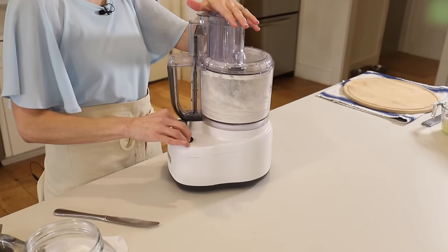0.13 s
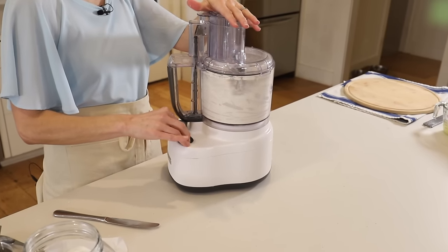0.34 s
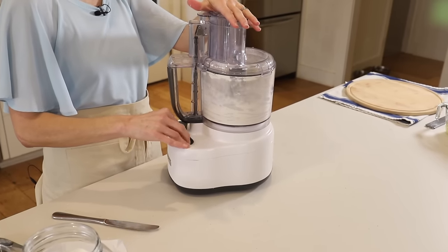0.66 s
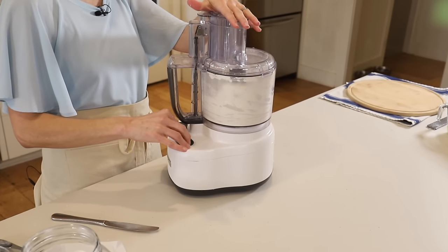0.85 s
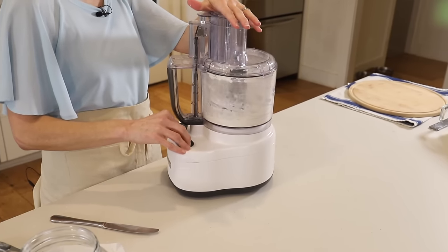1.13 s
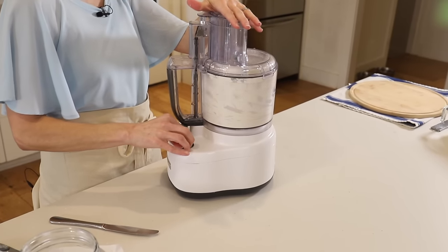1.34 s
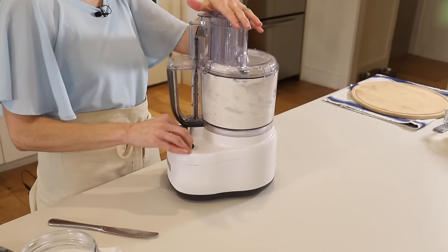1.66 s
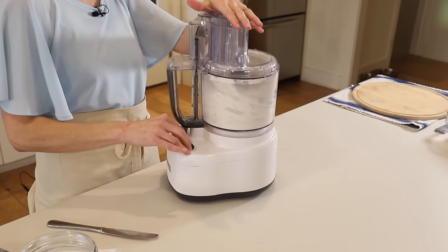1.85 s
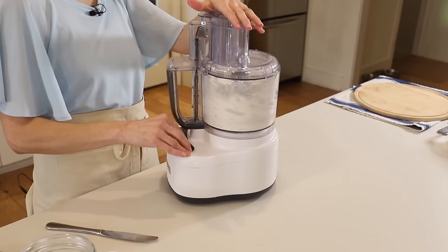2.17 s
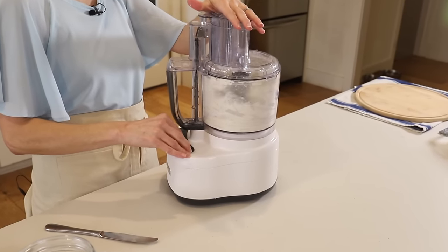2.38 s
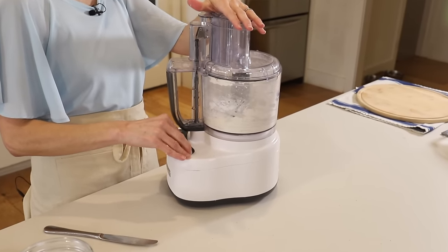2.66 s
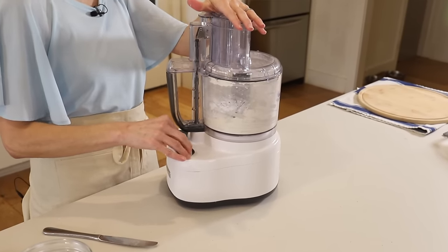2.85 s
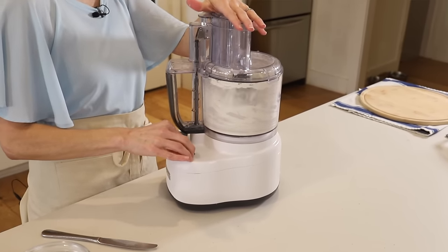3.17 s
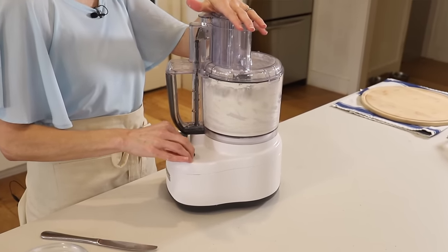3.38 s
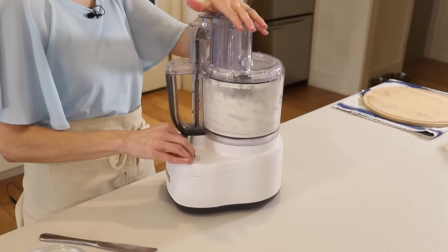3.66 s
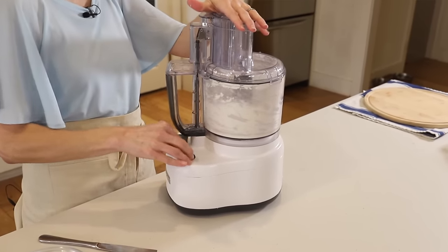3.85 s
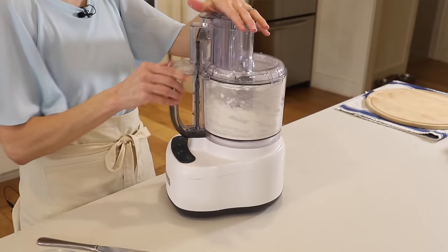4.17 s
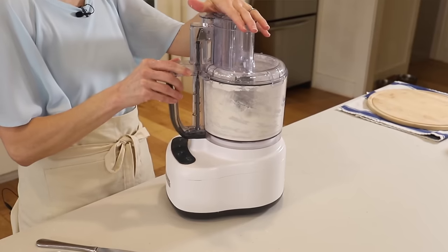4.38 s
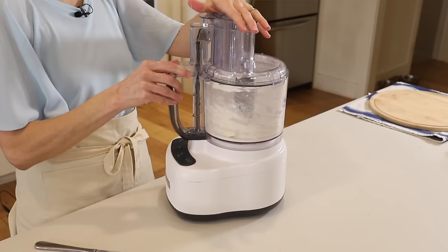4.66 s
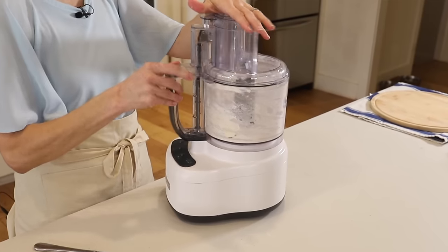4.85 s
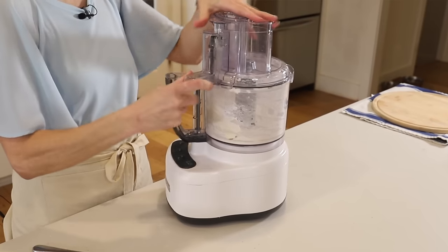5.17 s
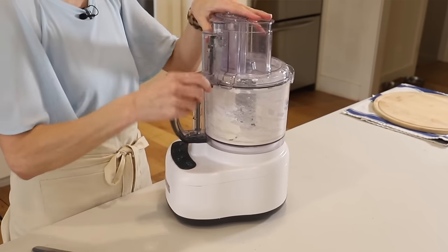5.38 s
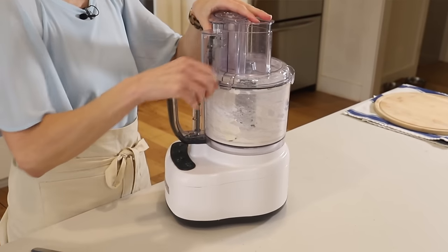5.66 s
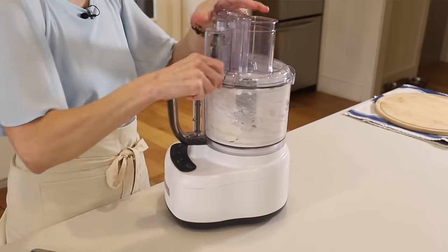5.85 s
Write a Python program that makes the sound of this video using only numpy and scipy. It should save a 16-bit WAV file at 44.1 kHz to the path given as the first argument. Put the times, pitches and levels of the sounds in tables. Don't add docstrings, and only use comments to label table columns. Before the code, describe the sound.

A food processor is already running, its loud whining gears and rough grind peppered with lumps knocking the plastic bowl. It winds down and brakes with a judder, pulses again, stops, then runs a longer, smoother pulse that sags to a halt. Crisp latch clacks, small lid taps and skin rubbing on plastic follow. Close chest-worn microphone, small kitchen with short echo and soft hiss.

```python
import sys
import numpy as np
from scipy import signal
from scipy.io import wavfile
from scipy.ndimage import uniform_filter1d

SR = 44100
rng = np.random.default_rng(int(sys.argv[2]) if len(sys.argv) > 2 else 0)


def wrap_up_sound(samples):
    columns = np.atleast_2d(samples).T
    tamed = np.clip(columns, -1, 1)
    steps = np.round(tamed * 32767).astype(np.int16)
    wavfile.write(sys.argv[1], SR, steps)


def ratio_of_db(decibels):
    return 10 ** (np.asarray(decibels, float) / 20)


N = 265555

# switch on t/s, brake grips t/s, lumpiness [0-1], free whine level/dB
PULSES = [
    (-.2, 0.887, .75, -25),
    (1.246, 2.266, 0.75, -24),
    (2.974, 4.512, 0.5, -24.5),
]
# t/s, churn level/dB
EFFORT = [
    [(0, -14), (.07, -19), (.3, -20.5), (.55, -20.5), (.7, -16.5), (.88, -20), (.925, -17.5), (1.0, -30),
     (1.07, -9.5)],
    [(1.268, -21), (1.31, -10), (1.41, -22.5), (1.58, -18), (1.72, -21.5), (1.92, -18.5), (2.26, -17.5),
     (2.33, -21), (2.53, -33)],
    [(2.992, -18.5), (3.02, -17), (3.08, -20), (3.23, -16.5), (3.35, -18), (4.42, -17.5), (4.51, -24),
     (4.61, -26.5), (4.73, -53)],
]
# f/Hz, level/dB
HOUSING = [(26, -94.5), (45, -43), (178, -2.5), (314, -9), (391, 5), (996, -5.5), (1210, -8.5), (1440, 0),
           (1800, -4.5), (2190, 0.5), (2600, -5.5), (3010, -2.5), (8660, -25), (16000, -34)]
# f/Hz, width/Hz, lift/dB
RINGS = [(431, 120, -1), (686, 15, 4.5), (960, 410, 8), (1420, 29, 6), (2180, 120, 5.5), (2650, 23, 6),
         (2930, 45, 2), (4620, 140, 6)]


def motor(effort, fall, pulse, load, teeth=85.0, lumps_per_turn=3.0, flecks_per_turn=3.2):
    overtone_fall = {"driven": -10.0, "braked": -2.0}
    # low f/Hz, high f/Hz
    patches = [(150, 700), (700, 1700), (1700, 2700), (2700, 4200), (4200, 9000)]
    # f/Hz, width/Hz, level above the churn/dB
    bowl_note = (2180, 60, -13.0)
    s, churn_db = np.transpose(effort)
    t = np.arange(s[0], s[-1], 1 / SR)
    count = len(t)
    churn_db = np.interp(t, s, churn_db)
    hz, first, bite, lumpy = speed_and_strain(t, fall, *pulse)
    speeding_up = np.gradient(hz) > 0
    lumpy = np.clip(lumpy, 0, .95)
    lump_swells = swells(lumps_per_turn * hz / teeth, 2.5, 0.0052)
    shake = np.sqrt(1 - lumpy ** 2 + (lumpy * lump_swells) ** 2)

    turn = np.exp(2j * np.pi * np.cumsum(hz) / SR)
    strain = shake + 1.94 * load[round(s[0] * SR):][:count]
    whine = first * np.clip(hz / 650, 0, 1) ** 2 * strain * turn
    whine = whine * flutter(count, 110, 0.98 - 0.95 * hz / 3300)
    fall_db = np.where(speeding_up, overtone_fall["driven"], overtone_fall["braked"])
    for k in range(2, 8):
        lift_db = read(HOUSING, k * hz) - read(HOUSING, 2 * hz) + fall_db * (k - 2)
        whine += bite * ratio_of_db(np.minimum(lift_db, 3)) * flutter(count, 40 * k, 0.46) * turn ** k
    shrill = ratio_of_db(-37.5 - 6.0 * ((3 * hz - 8350) / 450) ** 2) * speeding_up
    whine += shrill * flutter(count, 90, 0.84) * turn ** 3

    noise = shake * rng.standard_normal(count)
    ringing = np.clip(hz / 1100, 0, 1) ** 0.41
    plain = signal.oaconvolve(noise, causal(lambda f: read(HOUSING, f)))[:count]
    resonant = signal.oaconvolve(noise, causal(housing_db))[:count]
    grind = ringing * resonant + (1 - ringing) * plain
    for lo_hz, hi_hz in patches:
        flecks = swells(flecks_per_turn * hz / teeth, 2.5, 0.0031)
        grind = grind + 0.97 * lumpy * flecks * band(grind, lo_hz, hi_hz)
    note_hz, width, note_db = bowl_note
    note = evened(band(noise, note_hz - width / 2, note_hz + width / 2, order=1))
    note = ratio_of_db(note_db) * np.clip(hz / 2400, 0, 1) ** 1.5 * note

    sparks = evened(band(noise, 11000, 11500))
    air = evened(band(rng.standard_normal(count), 5300, 9130, order=4)) + ratio_of_db(-31.0) * sparks
    fan = ratio_of_db(-38.0) * (hz / 3300) ** 0.6 * air
    fade_in = np.minimum(1, (t - s[0]) / 0.0088 + (s[0] < .01))
    fade_out = np.minimum(1, (s[-1] - t) / 0.07)
    churn = ratio_of_db(churn_db - 1.0) * (evened(grind) + note)
    return s[0], fade_out * fade_in * (churn + whine.real + fan)


def speed_and_strain(t, fall, on_s, brake_s, lumpy, free_db):
    # t after the switch/s, rate of meeting gear teeth f/Hz
    climb = [
        (.018, 600),
        (.036, 930),
        (.075, 1564),
        (.115, 1950),
        (.165, 2394),
        (.225, 2813),
        (.35, 2996),
        (.5, 3240),
        (.75, 3410),
    ]
    # t/s, length/s, whine level/dB, overtone level/dB
    bites = [(0.594, 0.11, -21, -26), (0.914, 0.06, -15.5, -14), (0.966, .06, -27.5, -19),
             (1.284, 0.049, -24, -12), (1.34, .09, -20.5, -52), (2.255, 0.058, -17.5, -15.5),
             (2.35, 0.057, -17, -13), (2.053, 0.053, -22, -45), (4.195, 0.11, -26, -40),
             (2.311, 0.038, -26, -14), (2.406, 0.11, -34, -23.5), (3.008, 0.022, -33, -16),
             (3.018, 0.072, -48, -10), (3.07, .05, -17.5, -40), (3.213, 0.072, -16, -32),
             (4.454, 0.1, -30, -31), (4.52, 0.043, -19.5, -18), (4.554, 0.038, -33, -21.5),
             (4.595, 0.068, -59, -21), (0.668, 0.035, -27, -30)]
    top_hz, idle_db, top_db = 3200, -52, -37
    rise, fade_db = 0.11, -6
    hz = np.minimum(np.interp(t - on_s, *np.transpose(climb)), np.interp(t, *np.transpose(fall)))
    hz = uniform_filter1d(hz, size=400, mode="nearest")
    coasting = (t > fall[0][0]) * np.clip(1 - hz / top_hz, 0, 1)
    ring_lift_db = housing_db(hz) - read(HOUSING, hz)
    whine = ratio_of_db(free_db + 0.46 * ring_lift_db - 9 * coasting)
    bite = ratio_of_db(idle_db + (top_db - idle_db) * np.clip((hz - top_hz + 150) / 150, 0, 1))
    for s, length, whine_db, bite_db in bites:
        u = (t - s) / length
        shape = np.clip(u / rise, 0, 1) * np.clip((1 - u) / rise, 0, 1)
        shape = shape * ratio_of_db(fade_db * np.clip(u, 0, 1))
        whine = whine + ratio_of_db(whine_db) * shape
        bite = bite + ratio_of_db(bite_db) * shape
    return hz, whine, bite, lumpy * (1 - .3 * np.clip((t - brake_s) / .015, 0, 1))


def housing_db(hz):
    return read(HOUSING, hz) + sum(db / (1 + (2 * (hz - f) / width) ** 2) for f, width, db in RINGS)


def lumps(burst_s=0.0023):
    # t/s, peak level/dB, ring f/Hz, low thud level above the peak/dB
    hard_lumps = [(.069, -2, 3000, -15), (.115, -7.5, 3020, 9), (.203, -2, 2200, -13),
                  (.27, 2.5, 670, -0.5), (.309, -7, 2180, 9), (.437, -2, 2210, 0.5), (.493, -3.5, 2810, 6),
                  (.591, -7.5, 1385, -20), (.6115, 3, 2260, -35), (.755, -6, 1350, 9.5),
                  (.778, 0, 660, -31), (.905, -2.5, 950, 1), (1.279, -8, 790, -6), (1.384, -1.5, 2190, -29),
                  (1.46, -1.5, 2750, -20), (1.515, 0.5, 3080, -24), (1.6145, 0, 2180, -19),
                  (1.656, -1, 800, 8), (1.716, -7, 804, 1.5), (1.741, -5, 2100, 10),
                  (1.823, -22, 2090, -11), (1.8835, -0.5, 1420, 0.5), (1.939, 4.5, 920, -28),
                  (2.018, -6.5, 2770, -2), (2.1565, 1, 2060, -11), (2.1755, -8, 2190, -18),
                  (3.006, -1, 854.6, -5), (3.377, -0.5, 2182, 0), (4.072, -2, 2650, -13),
                  (4.2575, 0.5, 2190, 0)]
    out, load = np.zeros(N), np.zeros(N)
    colour, t = causal(housing_db), np.arange(1200) / SR
    blow = np.exp(-t / burst_s) * (1 - np.exp(-t / 0.0008))
    rows = hard_lumps + small_lumps()
    grit = rng.standard_normal((len(rows), 2, len(t)))
    for (s, db, hz, thud_db), (a, b) in zip(rows, grit):
        knock = signal.fftconvolve(a * blow, colour)[:len(t)]
        knock += 1.16 * band(a * blow, 0.82 * hz, 1.52 * hz)
        knock += 0.5 * ring(hz, 0.041, count=len(t))
        knock += ratio_of_db(thud_db + 4.0) * band(b * blow ** 0.24, 252, 910)
        add(out, s, ratio_of_db(db - 4.5) * knock)
        add(load, s, ratio_of_db(db) * 1.18 * blow ** 0.49)
    return out, load


def small_lumps(per_s=18):
    rows = []
    for effort, (_, brake_s, lumpy, _) in zip(EFFORT, PULSES):
        for k, (a, b, c, d) in enumerate(rng.random((32, 4))):
            s = effort[0][0] + (k + a) / per_s
            if s < brake_s:
                db = -10.5 + 2.5 * (b - 1 + 2 * lumpy)
                ring_hz = RINGS[2 + int(c * 5)][0]
                rows.append((s, db, ring_hz, -1.5 - 20 * d ** 2))
    return rows


def clicks():
    # t/s, peak level/dB, ring f/Hz, hollow level above the peak/dB, snap level above it/dB
    latch = [(1.26, -29, 2080, 9, 20), (2.9808, -30.5, 1980, 9, 8), (4.773, -26, 2310, -6, -20),
             (4.811, -43, 5400, -27, 16.5), (4.85, -33, 2620, 6, -32), (4.882, -29, 1975, 13, -17),
             (4.897, -3, 4430, 3.5, 6), (4.9186, -2.5, 2500, -16, -20), (4.9517, -7.5, 5440, 1, 4),
             (4.9754, -12, 2860, -1, -17), (4.9931, -9.5, 2740, 3, -14), (5.1209, -22.5, 2190, 2.5, 4),
             (5.9662, -14, 2770, -5, -16), (5.9715, -4.5, 3100, -9, 5)]
    # t/s, peak level/dB, ring f/Hz, hollow level above the peak/dB
    touches = [(5.229, -30, 1930, 3.5), (5.2504, -34, 4540, 16.5), (5.3128, -26.5, 3080, 3),
               (5.3772, -22, 3200, 6.5), (5.4024, -33, 3570, 13), (5.4122, -18.5, 2280, -12),
               (5.438, -34, 2980, 7), (5.4592, -25.5, 3070, -15), (5.5079, -32, 2310, -13),
               (5.5429, -17.5, 3510, 6), (5.5554, -24.5, 2250, 10), (5.5881, -22.5, 3280, 11.5),
               (5.6241, -31, 2680, 3), (5.762, -26.5, 4800, 5), (5.7902, -24, 2360, 2),
               (5.801, -32, 1960, 15), (5.8576, -31, 1930, 6), (5.8894, -32, 3170, 11),
               (5.908, -28, 3060, -16), (5.947, -23, 3280, -13)]
    out, t = np.zeros(N), np.arange(4000) / SR
    crack_t60, lid_t60 = 0.032, 0.06
    rows = [(*row, 469.3) for row in latch]
    rows += [(*row, -6, 584) for row in touches]
    grit = rng.standard_normal((len(rows), 3, len(t)))
    for (s, db, hz, hollow_db, snap_db, hollow_hz), (a, b, c) in zip(rows, grit):
        snap = ratio_of_db(snap_db - 12.0) * band(a * ratio_of_db(-60 * t / 0.0092), 6300, 12400)
        bright_hz = max(7404.5 + 110 * db, 3000)
        crack = 1.11 * band(b * ratio_of_db(-60 * t / crack_t60), 900, bright_hz, order=3)
        crack += 0.76 * ring(hz, 0.018)
        crack += 0.69 * band(b * ratio_of_db(-60 * t / 0.019), 0.75 * hz, 1.1 * hz)
        hollow = 0.73 * ring(hollow_hz * (1 + 0.092 * c[0]), lid_t60)
        hollow += 2.03 * band(c * ratio_of_db(-60 * t / lid_t60), 220, 1630)
        hollow = ratio_of_db(hollow_db - 5.0) * hollow * (1 - np.exp(-t / 0.0012))
        add(out, s, ratio_of_db(db - 3.5) * (snap + crack + hollow))
    return out


def hands(slips_per_s=300.0):
    # t/s, pressure level/dB
    rub = [
        (4.72, -59),
        (4.87, -81),
        (4.91, -25),
        (5.0, -33.5),
        (5.1, -45),
        (5.43, -51.5),
        (5.84, -53),
        (5.9, -38.5),
        (6.02, -33),
    ]
    # f/Hz, level/dB
    rub_colour = [(29, -54), (50, -22.5), (141, -12.5), (208, 14), (321, 0.5), (586, 14.5), (1210, 8.5),
                  (3250, 0.5), (16000, -36)]
    # t/s, half length/s, level/dB
    cloth = [
        (4.957, 0.1, -62),
        (5.438, 0.038, -46),
        (5.56, .05, -45.5),
        (5.902, 0.034, -45),
    ]
    t = np.arange(N) / SR
    rustle_db = np.interp(t, *np.transpose(rub), left=-120)
    scrape_db = -48.5 + .4 * (rustle_db + 31) - 14 * np.clip((t - 5.3) / 0.028, 0, 1)
    sway = ratio_of_db(-64) * (t > rub[0][0])
    sway = sway + sum(ratio_of_db(db) * np.exp(-((t - s) / half) ** 2) for s, half, db in cloth)
    noise = (1.2 + swells(np.full(N, slips_per_s), 6.1, 0.0055)) * rng.standard_normal(N)
    rustle = signal.oaconvolve(noise, causal(lambda hz: read(rub_colour, hz)))[:N]
    scrape = band(noise, 3700, 7200)
    bump = band(rng.standard_normal(N), 49, 205)
    return ratio_of_db(rustle_db) * evened(rustle) + ratio_of_db(scrape_db) * evened(scrape) + sway * evened(bump)


def kitchen(x):
    # f/Hz, time to fall by 60 dB t/s
    echo_times = [(150, 0.85), (500, 0.63), (1400, 0.61), (3000, 0.6), (4500, 0.59), (7000, 0.39),
                  (12000, 0.7)]
    taps = np.zeros(SR)
    at = np.arange(300, SR - 20, 20)
    taps[at + rng.integers(0, 20, len(at))] = rng.choice([-1., 1.], len(at))
    hz, t, z = signal.stft(taps, SR, nperseg=256)
    fade = ratio_of_db(-60 * t / read(echo_times, hz)[:, None])
    tail = signal.istft(z * fade, SR, nperseg=256)[1]
    return signal.fftconvolve(x, tail / np.linalg.norm(tail))[:N]


def hush():
    # f/Hz, level/dB
    hush_colour = [(18, -31), (30, 10), (473, 9.5), (889, 3.5), (1010, 5), (1500, 1.5), (2750, -4.5),
                   (8080, -12), (13300, -8), (16000, -14)]
    noise = signal.oaconvolve(rng.standard_normal(N), causal(lambda hz: read(hush_colour, hz)))[:N]
    return ratio_of_db(-55.5) * evened(noise)


def swells(rate, spread_db, burst_s):
    count = len(rate)
    sizes = ratio_of_db(spread_db * np.minimum(rng.exponential(1, count), 2.1))
    hits = (rng.random(count) < rate / SR) * sizes
    t = np.arange(1500) / SR
    swell = np.exp(-t / burst_s) * (1 - np.exp(-t / 0.00039))
    return evened(signal.oaconvolve(hits, swell)[:count])


def flutter(count, width_hz, firm):
    return firm + (drift(count, width_hz) + 1j * drift(count, width_hz)) / 2


def drift(count, top_hz):
    return evened(signal.lfilter(*signal.butter(2, top_hz / (SR / 2)), rng.standard_normal(count)))


def ring(hz, t60, count=4000):
    t = np.arange(count) / SR
    return ratio_of_db(-60 * t / t60) * np.sin(2 * np.pi * hz * t)


def band(x, lo_hz, hi_hz, order=2):
    edges = [lo_hz / (SR / 2), hi_hz / (SR / 2)]
    return signal.sosfilt(signal.butter(order, edges, "band", output="sos"), x)


def causal(db_of, size=8192):
    log_gain = np.log(ratio_of_db(np.maximum(db_of(abs(np.fft.fftfreq(size, 1 / SR))), -100)))
    taps = np.fft.ifft(np.exp(log_gain - 1j * signal.hilbert(log_gain).imag)).real[:size // 2]
    return taps / np.linalg.norm(taps)


def read(points, hz):
    f, value = np.transpose(points)
    return np.interp(np.log(hz + 1), np.log(f + 1), value)


def evened(x):
    return x / np.sqrt(np.mean(x ** 2) + 1e-20)


def add(mix, s, sound):
    part = mix[round(s * SR):][:len(sound)]
    part += sound[:len(part)]


def scene():
    # t/s, rate of meeting gear teeth f/Hz
    falls = [
        [(.42, 3300), (.5, 2940), (.61, 2319), (.68, 1860), (.78, 1450), (.9, 1095), (.955, 858.4), (1.0, 566),
         (1.07, 307)],
        [(1.92, 3305), (2.0, 2920), (2.17, 2062), (2.25, 1774), (2.31, 1320), (2.345, 1080), (2.4, 764.5),
         (2.45, 509), (2.5, 305)],
        [(3.9, 3415), (4.05, 2690), (4.17, 2179), (4.29, 1695), (4.42, 1183), (4.53, 815.5), (4.6, 515.5),
         (4.65, 348.4), (4.7, 258)],
    ]
    machine, load = lumps()
    for effort, fall, pulse in zip(EFFORT, falls, PULSES):
        add(machine, *motor(effort, fall, pulse, load))
    near = clicks() + hands()
    echo = kitchen(ratio_of_db(-8.0) * machine + ratio_of_db(-10.5) * near)
    return (machine + near + echo + hush())[None]


def roll_off(x):
    return signal.sosfilt(signal.butter(12, 16510, fs=SR, output="sos"), x)


def record(dry):
    ceiling = .95
    soft = ceiling * np.tanh(dry / ceiling)
    soft = signal.sosfilt(signal.butter(4, 56 / (SR / 2), "high", output="sos"), soft)
    below = signal.oaconvolve(soft, signal.firwin(255, 9200, fs=SR)[None], "same")
    soft = below + ratio_of_db(-2.0) * (soft - below)
    top_cut = signal.firwin(511, 15700, window=("kaiser", 9), fs=SR)
    mix = signal.oaconvolve(soft, top_cut[None], "same")
    return roll_off(mix)


dry = scene()
out = record(dry)
wrap_up_sound(out)
```